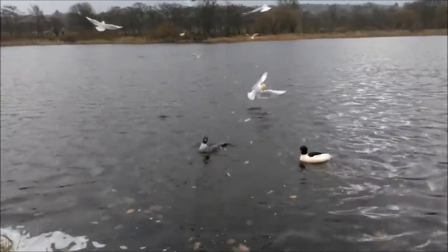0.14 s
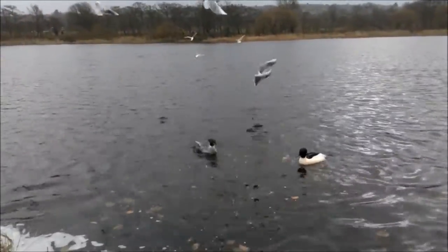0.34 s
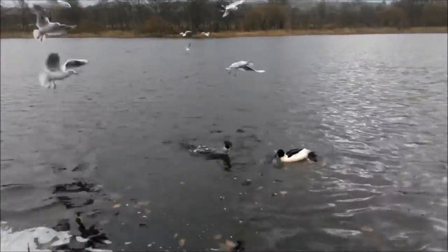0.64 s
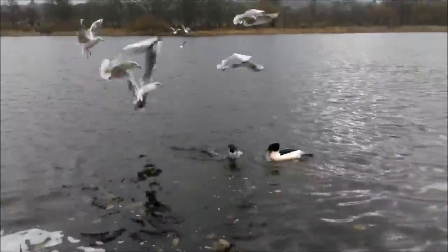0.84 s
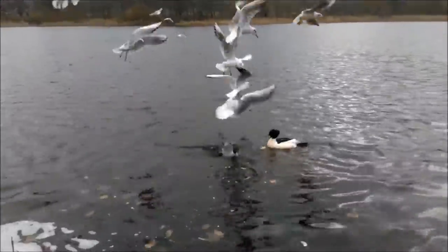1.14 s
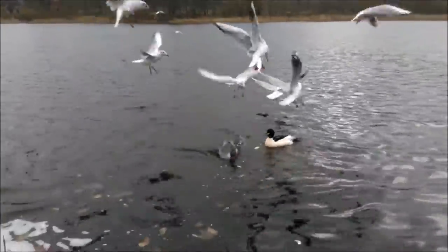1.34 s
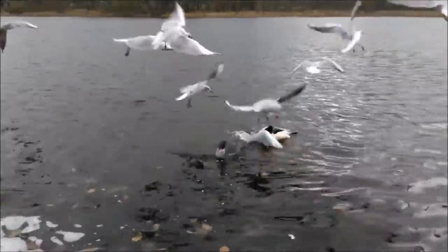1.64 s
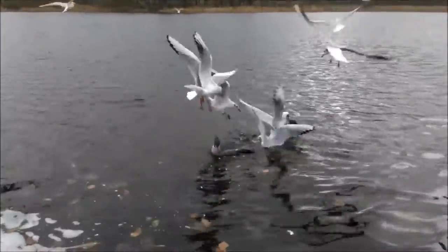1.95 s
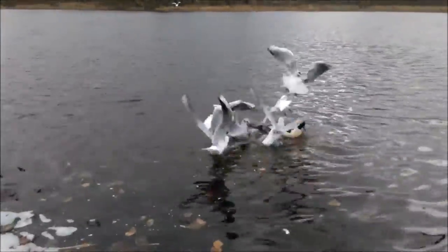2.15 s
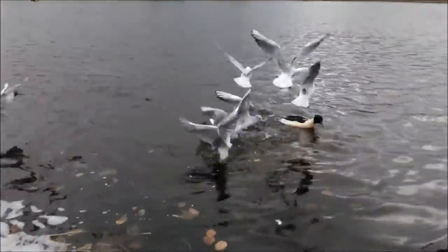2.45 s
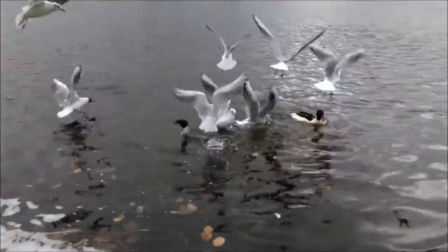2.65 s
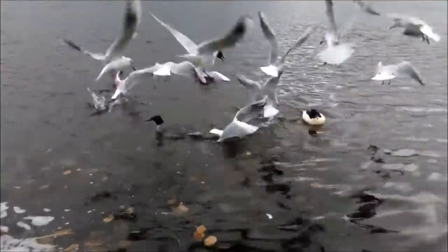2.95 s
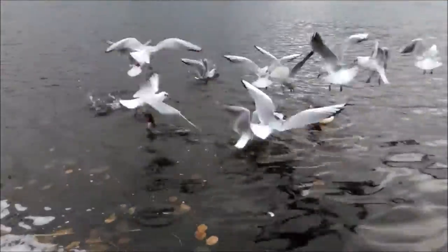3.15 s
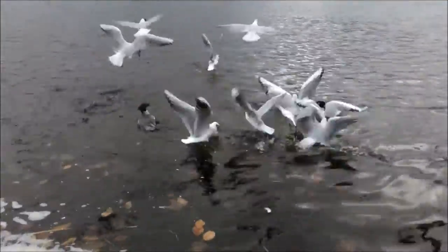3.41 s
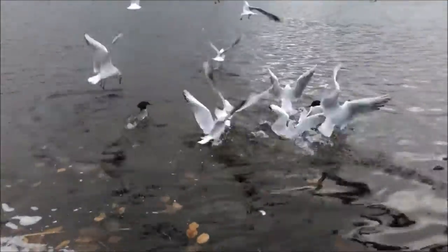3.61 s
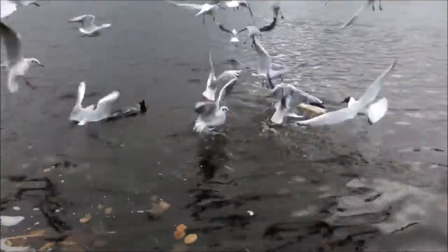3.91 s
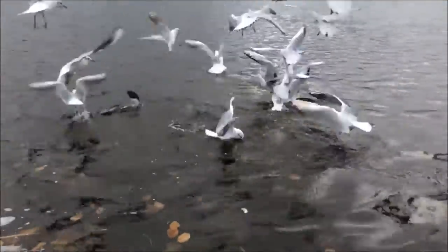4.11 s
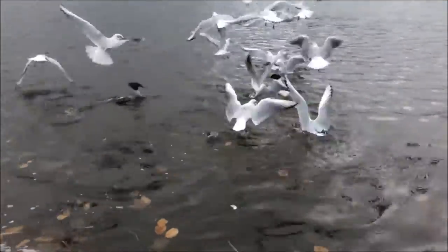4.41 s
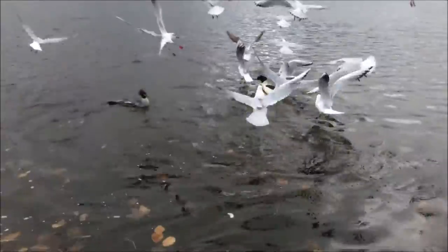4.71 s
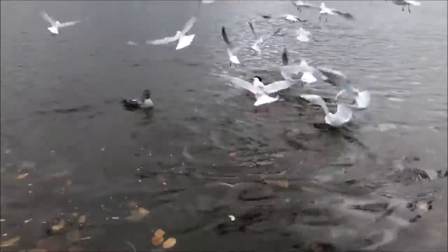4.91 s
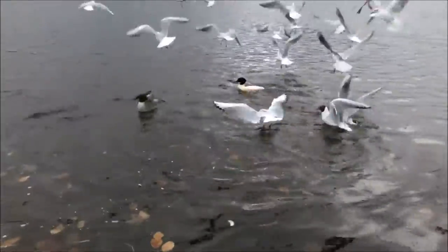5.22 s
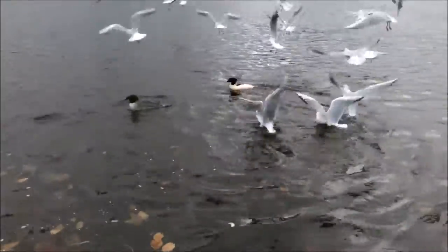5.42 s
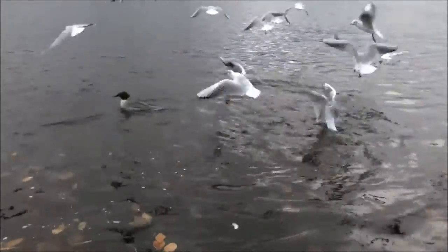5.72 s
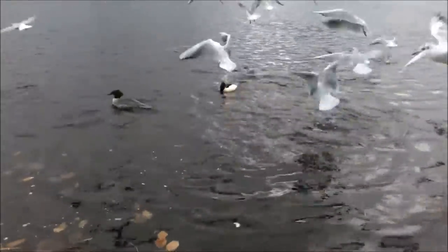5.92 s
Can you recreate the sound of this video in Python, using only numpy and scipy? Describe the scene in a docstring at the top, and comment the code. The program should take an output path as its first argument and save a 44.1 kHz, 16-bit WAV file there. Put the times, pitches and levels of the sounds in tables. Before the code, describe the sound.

A flock of gulls squabbles over food on a river, a few metres from a phone on the bank. Short, harsh squawks start within the first second and follow one another rapidly, with light slaps of wings and feet on the water and a soft patter of spray. Midway the calls and splashes peak and wind buffets the microphone with a loud low rumble. Smaller gusts follow as the calls thin out.

```python
"""Gulls squabble over food thrown on a river, a few metres from a phone on the bank.
Each short squawk is a pulse train on an arched pitch, chopped by a slow vibration of the syrinx,
filtered by throat and beak, and reflected by the water and the banks. Wings and feet slap the river;
drops fall back and trap ringing bubbles. Eddies in the gusts buffet the two microphone ports
separately, over a faint far-off hum."""
import sys
import numpy as np
from scipy import signal
from scipy.fft import rfft, irfft
from scipy.io import wavfile

SR = 44100
rng = np.random.default_rng(int(sys.argv[2]) if len(sys.argv) > 2 else 0)


def to_wav(sig):
    """Store sig (one row per channel, or 1-D mono) as 16-bit WAV at the path in sys.argv[1].

    Samples outside -1..1 are clipped; the rate is SR.
    """
    pcm = np.clip(np.atleast_2d(sig), -1, 1) * 32767
    pcm = np.round(pcm).astype(np.int16)
    wavfile.write(sys.argv[1], SR, pcm.T)  # frames by channels


N = 267378
T = np.arange(N) / SR

# Levels in the tables are relative: each source applies its own gain.
# near calls: (peak time [s], length [s], pitch [Hz], roughness [0-1], level [dB], beak opening [dB])
CALLS = [(0.682, 0.0524, 794.5, 0.33, -48.5, -5.5), (0.793, 0.0523, 698, 0.11, -63, -16),
         (0.909, 0.0832, 950, 0.41, -37.5, 11), (0.961, 0.0465, 920, 0.37, -41.5, 3.5),
         (1.094, 0.0714, 1091, 0.06, -37.5, 15), (1.161, 0.07, 939, 0.14, -44.5, 1.5),
         (1.257, 0.0692, 808, 0.45, -39.5, -6), (1.511, 0.047, 1014, 0.46, -44, 2),
         (1.715, 0.0368, 796.3, 0.27, -52, -2), (1.846, 0.0619, 1021, 0.44, -37, 9.5),
         (1.921, 0.048, 920, 0.8, -50.5, -2.5), (2.038, 0.0689, 878.3, 0.34, -37, -2),
         (2.404, 0.0662, 989, 0.38, -40.5, -0.5), (2.619, 0.0878, 764, 0.42, -46.5, -10),
         (2.797, 0.0597, 759, 0.68, -43.5, -0.5), (2.876, 0.0579, 884.6, 0.7, -39.5, 0),
         (2.991, .08, 917.5, 0.53, -25, 7), (3.165, 0.0782, 1067, 0.5, -30, 13),
         (3.232, 0.082, 945, 0.71, -34.5, 13), (3.393, .065, 986, .4, -34.5, -3),
         (3.471, 0.0633, 891.2, 0.9, -42.5, 2), (3.638, 0.0758, 904.2, 0.54, -32.5, 3),
         (3.932, 0.1029, 900, 0.6, -34, -4), (4.049, 0.0585, 768, 0.62, -43.5, 6.5),
         (4.145, .06, 967.7, 0.52, -34, 1.5), (4.199, 0.0846, 875, 0.72, -32, 5),
         (4.247, 0.0433, 979, 0.14, -40.5, -2.5), (4.373, 0.102, 847.7, .55, -36, 4.5),
         (4.562, 0.0752, 852.5, 0.34, -37.5, 7), (4.637, 0.0979, 916, 0.34, -35.5, 0),
         (4.84, 0.0613, 903.3, 0.83, -50.5, -2.5), (4.933, 0.054, 746, 0.13, -53, 2),
         (5.013, 0.088, 804, 0.78, -40, 3.5), (5.163, 0.0472, 802.8, 0.2, -45.5, -6.5),
         (5.53, .06, 855.2, 0.1, -43.5, -5), (5.718, .058, 813.8, 0.11, -41.5, 2),
         (5.769, 0.056, 906, 0.76, -51.5, 7.5)]
# throat and beak resonances: (frequency [Hz], width [Hz], gain [dB], gain per beak opening [dB/dB])
FORMANTS = [(770, 840, -20, -1.33), (1836, 812, 6, -0.1), (3151.5, 1560, 0.5, 0.912),
            (4217, 860, -2, 0.046), (5383, 2230, -10.5, 0.697), (9470, 4700, -14.5, 0.603)]
# direction of the squabble: (time [s], lead of the left port [ms])
LEFT_LEAD = [(.7, 0.2717), (1.9, 0.222), (2.95, 0.239), (3.4, 0.035), (3.7, 0.2764), (4.2, 0.244),
             (4.65, 0.075), (5.7, -0.069)]
# right port's response to the near calls, hollow in the mids: (frequency [Hz], gain [dB])
RIGHT_CALL_RESPONSE = [(500, 10), (1700, 10.5), (2700, -2.5), (4000, 1), (6000, 4.5), (9500, 8),
                       (13000, 2.5)]
# feet, wings and food striking the water: (time [s], level [dB], body [dB])
IMPACTS = [(0.45, -36, -28), (0.5631, -34, -22.5), (1.487, -31, -25.5), (1.693, -33.5, -15.5),
           (1.833, -29.5, -25), (1.892, -36.5, -19), (2.1065, -33.5, -14.5), (2.1729, -36.5, -36.5),
           (2.267, -35, -28.5), (2.3095, -31.5, -11), (2.5056, -28.5, -13.5), (2.522, -25, -17),
           (3.268, -22.5, -6.5), (3.3047, -23.5, -6.5), (3.478, -26, -12.5), (3.5177, -23, -13.5),
           (3.5517, -22.5, -10.5), (3.7549, -27, -18), (3.8834, -24, -9.5), (4.3799, -28, -8),
           (4.8144, -29.5, -9.5), (5.363, -31, -7)]
# spray from churned water: (time [s], level [dB])
SPRAY_LEVEL = [(0.0, -99.5), (0.37, -69.5), (0.61, -60), (0.94, -70.5), (1.04, -60), (1.57, -67.5),
               (1.99, -58.5), (3.29, -49), (4.08, -48.5), (4.34, -56), (5.08, -57.5), (5.33, -63),
               (5.65, -59), (6.06, -68)]
# spectrum of the spray: (frequency [Hz], level [dB])
SPRAY_SPECTRUM = [(250, -6.5), (500, 2), (1000, -9), (2000, 0), (4000, -1), (6500, -5.5), (9200, 2),
                  (12000, -3.5), (15500, -13)]
# right port's response to the spray: (frequency [Hz], gain [dB])
RIGHT_SPRAY_RESPONSE = [(1200, 3.5), (2600, -4.5), (5000, -2), (9000, 5.5), (13000, -13)]
# light breeze at the ports: (time [s], level [dB])
BREEZE_LEVEL = [(0, -46.5), (.6, -49.5), (1.15, -59), (2.2, -56), (2.8, -52), (3.3, -38), (3.9, -43),
                (4.4, -43), (5.25, -47), (6.06, -46)]
# gusts: (start [s], hold [s], level [dB], left minus right [dB])
GUST_EVENTS = [(0.44, 0.125, -46.5, 1.5), (0.81, 0.023, -43, 16), (1.427, 0.043, -45.5, -9),
               (2.882, 0.228, -35.5, -6), (3.034, 0.1245, -28, -1.5), (3.177, 0.064, -41, 10),
               (3.34, 0.182, -24, -7.5), (3.556, 0.171, -26, 0.5), (4.101, 0.0224, -26.5, 0),
               (4.176, 0.1095, -35.5, -11), (4.556, 0.0133, -30.5, 5.5), (4.641, 0.0982, -37, 3),
               (4.839, 0.176, -29.5, -3.5), (5.04, 0.088, -35.5, 4), (5.365, 0.1128, -34.5, -16),
               (5.581, 0.0875, -32, -15.5), (5.91, 0.042, -38.5, -15)]
# pressure spectrum of large eddies: (frequency [Hz], level [dB])
LARGE_EDDIES = [(20, -24.5), (45, 2.5), (80, 4.5), (140, 1), (220, -9), (350, -24.5), (600, -46.5),
                (1200, -51.5)]
# pressure spectrum of small eddies: (frequency [Hz], level [dB])
SMALL_EDDIES = [(60, -10.5), (150, 1.5), (260, 1), (400, -8), (650, -16), (1000, -37.5), (2000, -56)]
# vortices hitting the ports: (time [s], peak level [dB], base frequency [Hz], left minus right [dB])
VORTICES = [(1.371, -21.5, 120, 22), (2.925, -18, 139.2, 17), (3.449, -14, 110.9, 3),
            (3.479, -9.5, 218, -36), (3.574, -6.5, 171.6, 14), (3.61, 0, 236, 33.5), (3.706, -13, 192.5, 2),
            (3.730, -9.5, 100.9, 15), (4.548, -17.5, 165, 20.5), (4.851, -17.5, 233, 21),
            (4.958, -16.5, 215, -22), (5.389, -18, 205, -30), (5.444, -20.5, 146, -30.5)]
# spectrum of the far-off hum: (frequency [Hz], level [dB])
HUM_SPECTRUM = [(30, 2), (120, -0.5), (300, -13.5), (600, -12), (900, -8), (1400, -19.5), (2500, -25),
                (6000, -28.5), (15000, -30.5)]


def gulls(gain_db=-2, pan_db=10, peak_share=.54, glide_per_beak_db=.0235):
    """Path difference: each near call reaches the two ports with a lag set by its direction."""
    out = np.zeros((2, N))
    for peak, length, pitch_hz, rough, db, beak_db in CALLS:
        start = peak - peak_share * length
        rattle_hz = 71.6 * np.exp(.1213 * rng.standard_normal())
        glide = glide_per_beak_db * beak_db  # the wider the beak, the more the pitch climbs
        call = squawk(start, peak, start + length, pitch_hz, glide, rattle_hz, rough, beak_db)
        lag = int(round(np.interp(start, *np.transpose(LEFT_LEAD)) * SR / 1000))
        ports = np.array([river_reflection(call), np.roll(river_reflection(call), lag)])
        add(out, start - .02, ports * sides(pan_db) * undb(db + gain_db))
    return np.array([out[0], colour(out[1], RIGHT_CALL_RESPONSE)])


def squawk(start, peak, end, pitch_hz, glide, rattle_hz, rough, beak_db, arch=.16, edge_db=-19):
    """Source and filter: syrinx pulses, amplitude-modulated by a slow rattle, excite the throat."""
    t = start + np.arange(int((end - start + .04) * SR)) / SR - .02  # 20 ms margin at each end
    n = len(t)
    position = np.clip(2 * (t - start) / (end - start) - 1, -1, 1)
    # a second, slow vibration of the syrinx lets the voice build up and then snaps it shut
    turns = np.cumsum(rattle_hz * (1 + .18 * walk(70, n))) / SR
    angle = 2 * np.pi * (turns - np.interp(peak, t, turns))
    rattle = np.cos(angle + .45 * (1 - np.cos(angle)))
    wobble = .015 * rattle + .028 * walk(110, n)
    jitter = .04534 * (.113 + rough) * walk(691.1, n)
    hz = pitch_hz * (1 + glide * position - arch * position ** 2 + wobble + jitter)
    phase = 2 * np.pi * np.cumsum(hz) / SR
    # the upper harmonics trail the lower ones, so each pulse is a tiny chirp
    orders = np.arange(1, 17)[:, None]
    pulses = unit(np.cos(orders * phase - .293 * orders ** 2).sum(axis=0))
    # in harsh calls strong and weak pulses alternate, and air rasps in step with the pulses
    pulses *= 1 + rough * (.296 * np.cos(phase / 2) + .88 * walk(602.2, n))
    rasp = .974 * (.265 + rough) * rng.standard_normal(n) * (1 + 1.14 * np.cos(phase))
    contour_db = np.interp(t, [t[0], start, peak, end, t[-1]], [-55, edge_db, 0, edge_db, -55])
    swell = undb(contour_db * (.4324 + .101 * position ** 2))
    depth = np.clip(.816 - .838 * rough, 0, 1)  # the rattle blurs in hoarse calls
    source = (pulses + rasp) * swell * (1 + depth * rattle) * undb(1.5 * walk(90, n))
    return throat(source, pitch_hz, beak_db, position)


def throat(source, pitch_hz, beak_db, position, leak_db=-23, core_hz=4500):
    """Resonance: throat and beak impose formants, which rise as the throat tightens with pitch."""
    n = len(source)
    f = np.maximum(np.fft.rfftfreq(n, 1 / SR), 1) * (900 / pitch_hz) ** .164
    tunings = 1 + .02 * rng.standard_normal(len(FORMANTS))  # no two birds are quite alike
    power = undb(leak_db) ** 2 / (1 + (pitch_hz / f) ** 4)  # leakage between the resonances
    for (hz, width, db, beak_share), tuning in zip(FORMANTS, tunings):
        detuning = (f ** 2 - (hz * tuning) ** 2) / (f * width)
        power += undb(db + beak_share * beak_db) ** 2 / (1 + detuning ** 2) ** 2
    spectrum = rfft(source) * np.sqrt(power)
    core = irfft(spectrum / (1 + (f / core_hz) ** 8), n)
    treble = irfft(spectrum, n) - core
    return unit(core + treble * undb(2.5 - 6 * position ** 2))  # brightest in mid-call


def river_reflection(call, reflectance=.748):
    """Interference: a reflection off the river combs the call, its delay sliding as the bird flies."""
    i = np.arange(len(call))
    delay = SR * rng.uniform(.0007, .003) * np.linspace(1, rng.uniform(.8, 1.2), len(call))
    return unit(call + reflectance * np.interp(i - delay, i, call))


def slaps(gain_db=-23, t60=.0445, rise_s=.0028, pan_db=6):
    """Impact noise: each slap throws up a burst of crackling spray; heavier ones have more body."""
    out = np.zeros((2, N))
    t = T[:SR // 8] - .015
    swell = np.where(t < 0, np.exp(np.minimum(t, 0) / rise_s), undb(-60 * t / t60))
    for time, db, body_db in IMPACTS:
        crackle = rng.standard_normal((2, len(t))) * undb(5 * walk(920.3, len(t)))
        body = [(200, body_db - 14), (600, body_db), (3500, body_db + 10.5)]
        burst = colour(crackle, body + [(6500, -2.5), (11000, -.5), (15500, -16)])
        add(out, time + t[0] + rise_s, unit(burst * swell) * undb(db + gain_db) * sides(pan_db))
    return out


def spray(gain_db=5, drops_per_s=900, fizz_db=-5, pan_db=2):
    """Shot noise: drops strike the river at random, over the fizz of churned water."""
    sizes = undb(3 * np.minimum(rng.exponential(size=N), 5))
    drops = (rng.random(N) < drops_per_s / SR) * sizes * rng.choice([-1, 1], N)
    drops = unit(np.array([drops, np.roll(drops, 8)]))
    fizz = undb(fizz_db) * rng.standard_normal((2, N))
    patter = unit(colour(drops + fizz, SPRAY_SPECTRUM))
    patter[1] = colour(patter[1], RIGHT_SPRAY_RESPONSE)
    level_db = np.interp(T, *np.transpose(SPRAY_LEVEL)) + gain_db + 1.305 * walk(45, N)
    return patter * undb(level_db) * sides(pan_db)


def bubbles(gain_db=7, spread_db=3, centre_hz=4500, octaves=.862, decay_cycles=9, count=110):
    """Bubble resonance: air trapped by a drop rings briefly and rises in pitch, louder amid spray."""
    out = np.zeros((2, N))
    t = T[:SR // 30]
    for when, pitch, strength, side in rng.random((count, 4)):
        time = .4 + when * (T[-1] - .4)
        turns = t * centre_hz * 2 ** (octaves * (2 * pitch - 1))
        rise = 1 + .1315 * np.tanh(turns / decay_cycles / 4)
        ring = np.sin(2 * np.pi * turns * rise) * np.exp(-turns / decay_cycles)
        level_db = np.interp(time, *np.transpose(SPRAY_LEVEL)) + gain_db + spread_db * (2 * strength - 1)
        add(out, time, ring * undb(level_db) * sides(10 * (side - .5) + 2))
    return out


def river_echo(x, near_db=-10, near_t60=.048, far_db=-26, far_t60=.566):
    """Reverberation: ripples scatter the sound at once; the banks return a long, dull tail."""
    t = T[:SR]
    ripples = rng.standard_normal((2, SR)) * undb(-60 * t / near_t60) * (t > .002)
    banks = colour(rng.standard_normal((2, SR)), [(1800, 2), (4000, -4), (10000, -8)])
    banks *= undb(-60 * t / far_t60) * (t > .02)
    response = (undb(near_db) * unit(ripples) + undb(far_db) * unit(banks)) / np.sqrt(SR)
    return signal.fftconvolve(x, response, axes=1)[:, :N]


def wind(large_flutter_db=3.5, small_flutter_db=5.5, small_growth=1.431):
    """Turbulence: eddies cross each port independently; small ones grow faster with the gust."""
    out = []
    for db in wind_level():
        large = unit(colour(rng.standard_normal(N) * undb(large_flutter_db * walk(35, N)), LARGE_EDDIES))
        small = unit(colour(rng.standard_normal(N) * undb(small_flutter_db * walk(90, N)), SMALL_EDDIES))
        small_db = -35.5 + small_growth * (db + 29.5)
        out.append(large * undb(db) + small * undb(small_db))
    return np.array(out)


def wind_level(rise_s=.01785, fall_s=.0384):
    """Incoherent addition: the powers of breeze and gusts sum to a level in dB at each port."""
    power = undb(np.interp(T, *np.transpose(BREEZE_LEVEL))) ** 2
    for start, hold, db, pan_db in GUST_EVENTS:
        swell = np.exp(np.minimum(T - start, 0) / rise_s - np.maximum(T - start - hold, 0) / fall_s)
        power = power + (undb(db) * swell * sides(pan_db)) ** 2
    return 10 * np.log10(power)


def buffets(gain_db=-3, decay_cycles=.578):
    """Vortex pressure: a single eddy hits a port with a few swings, fastest at its peak."""
    out = np.zeros((2, N))
    t = T[:SR // 10] - .03
    for time, db, hz, pan_db in VORTICES:
        turns = t * hz
        envelope = np.exp(-np.abs(turns) / (decay_cycles * np.where(t < 0, .4, 1)))
        swing = np.cos(2 * np.pi * (turns + .1012 * np.tanh(5.97 * turns)))
        add(out, time + t[0], undb(db + gain_db) * envelope * swing * sides(pan_db))
    return out


def far_gulls(db=-58, spread_db=2, length_s=.054, count=14):
    """Spreading loss: the rest of the flock calls faintly from afar at the height of the squabble."""
    out = np.zeros((2, N))
    for peak in np.linspace(2.4, 5.1, count) + rng.uniform(-.1, .1, count):
        detune, strength = rng.standard_normal(2)
        start, end = peak - length_s / 2, peak + length_s / 2
        pitch_hz = 830 * np.exp(.092 * detune)
        call = squawk(start, peak, end, pitch_hz, glide=0, rattle_hz=71.6, rough=.412, beak_db=-4)
        ports = np.array([river_reflection(call), river_reflection(call)])
        add(out, start, ports * undb(db + spread_db * strength))
    return out


def far_hum(db=-58):
    """Partial coherence: steady distant noise is only partly shared by the two ports."""
    shared = rng.standard_normal(N)
    separate = 1.83 * rng.standard_normal((2, N))
    return undb(db) * unit(colour(shared + separate, HUM_SPECTRUM))


def undb(db):
    """Amplitude ratio of a level in decibels."""
    return 10 ** (np.asarray(db) / 20)


def unit(x):
    """Normalisation to unit RMS."""
    return x / np.sqrt(np.mean(x ** 2))


def sides(db):
    """Constant-power panning: left and right gains for a level difference."""
    gains = undb(np.array([np.atleast_1d(db), -np.atleast_1d(db)]) / 2)
    return gains / np.sqrt(np.mean(gains ** 2, axis=0))


def colour(x, points):
    """Zero-phase filtering by a curve of (frequency [Hz], gain [dB]) points."""
    hz, db = np.transpose(points)
    f = np.maximum(np.fft.rfftfreq(x.shape[-1], 1 / SR), 1)
    gain = undb(np.interp(np.log(f), np.log(hz), db))
    return irfft(rfft(x) * gain, x.shape[-1])


def walk(rate, size):
    """Random modulation of about unit spread, interpolated between rate values a second."""
    position = np.arange(size) * rate / SR
    knots = rng.standard_normal(int(position[-1]) + 2)
    return 1.2 * np.interp(position, np.arange(len(knots)), knots)


def add(out, time, x):
    """Superposition of a stereo sound, starting at a time in seconds."""
    i = max(int(time * SR), 0)
    out[:, i:i + x.shape[-1]] += x[:, :N - i]


def scene():
    """Superposition: calls, slaps and bubbles with their echo, then spray, wind and hum."""
    squabble = gulls() + far_gulls() + slaps() + bubbles()
    return squabble + river_echo(squabble) + spray() + wind() + buffets() + far_hum()


def record(dry):
    """Band limiting: the phone cuts rumble below 22 Hz and treble above 15.9 kHz."""
    highpass = signal.butter(2, 22, "high", fs=SR, output="sos")
    lowpass = signal.ellip(10, .2, 80, 15900, fs=SR, output="sos")
    return signal.sosfilt(lowpass, signal.sosfilt(highpass, dry))


dry = scene()
out = record(dry)
to_wav(out)
```